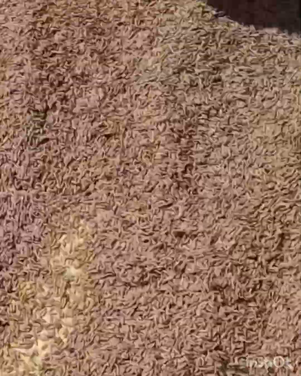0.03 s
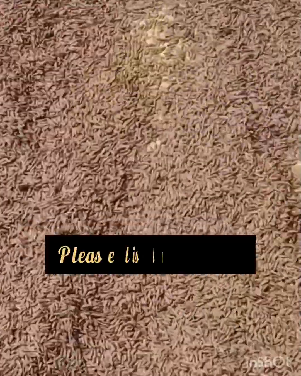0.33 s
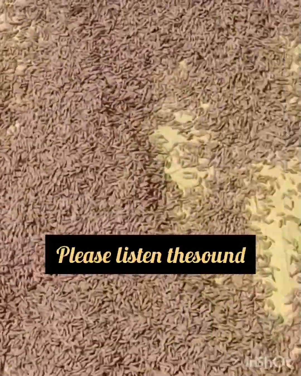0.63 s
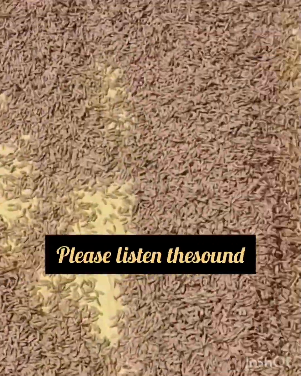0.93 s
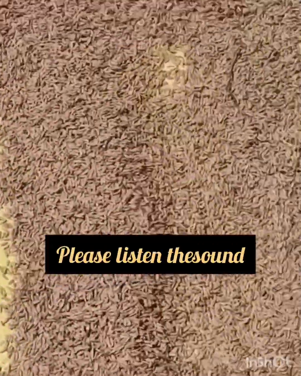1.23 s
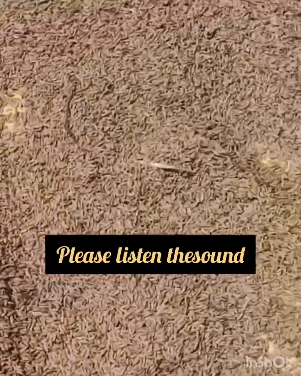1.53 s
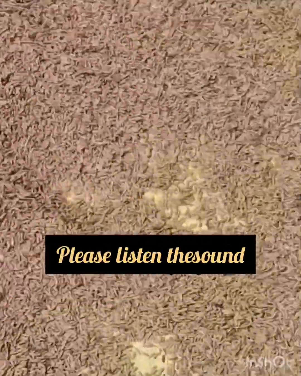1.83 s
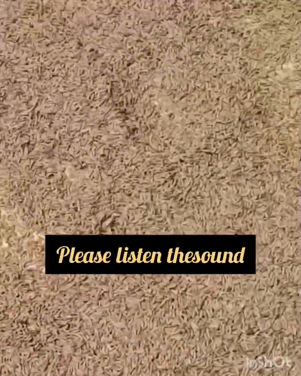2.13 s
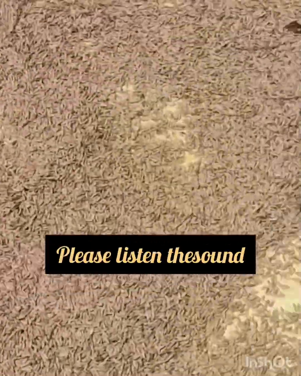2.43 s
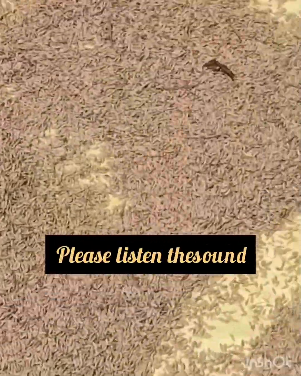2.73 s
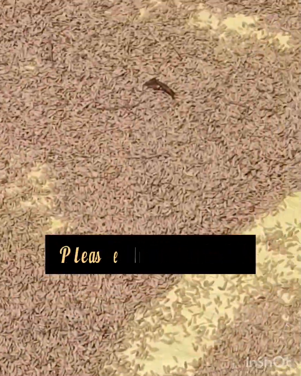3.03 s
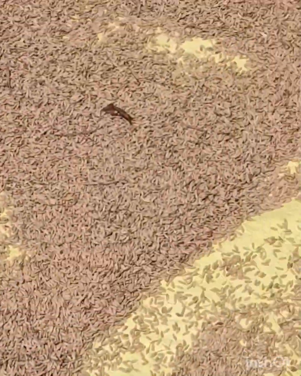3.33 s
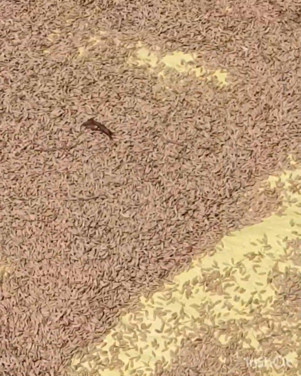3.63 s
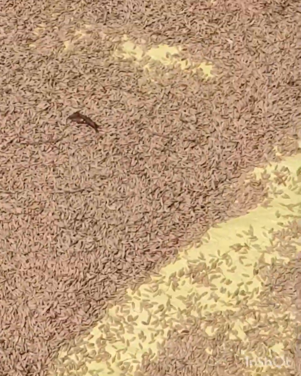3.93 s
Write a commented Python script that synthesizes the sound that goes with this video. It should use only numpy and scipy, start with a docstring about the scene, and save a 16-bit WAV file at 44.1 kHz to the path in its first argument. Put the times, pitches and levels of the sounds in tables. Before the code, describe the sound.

Unhusked rice swept along in five hissing, rustling strokes outdoors.

```python
"""Sweeping rice on a tarpaulin

Unhusked rice is swept along in five strokes, close to a hand-held camera outdoors. Countless husks
rub into a hiss with a fine sizzle on top; where a stroke bears down, a lower scrape and short scuffs
join in. There are three small knocks, and a low wavering hum comes up in the second half."""
import sys
import numpy as np
from scipy import signal
from scipy.fft import rfft, irfft, next_fast_len
from scipy.io import wavfile
from scipy.ndimage import uniform_filter1d, map_coordinates

SR = 44100
rng = np.random.default_rng(int(sys.argv[2]) if len(sys.argv) > 2 else 0)


def materialize(psi):
    """Save the field psi as 16-bit PCM at rate SR to the path in sys.argv[1].

    A 1-D psi becomes a single channel; in a 2-D psi each row is a channel.
    """
    bounded = np.clip(np.atleast_2d(psi).T, -1, 1)
    quanta = np.round(bounded * 32767).astype(np.int16)
    wavfile.write(sys.argv[1], SR, quanta)


N = 176400

# The outdoor background. Each row: frequency in Hz, relative level in dB.
AIR_SPECTRUM = [(15, -37), (25, -6.5), (69, 8.5), (92, 7.5), (306, -14.5), (446, -16.5), (763, -12.5),
                (1030, -35), (1190, -30), (1560, -12.5), (1800, -21.5), (2340, -49), (3960, -120)]
# How the hum swells. Each row: time in seconds, relative level in dB.
HUM_LEVELS = [(2.15, -80), (2.282, -45), (2.458, -43.5), (2.478, -56), (2.53, -43), (2.576, -64),
              (2.648, -50.5), (2.778, -47.5), (2.808, -61), (2.866, -42.5), (2.974, -65), (3.144, -64),
              (3.246, -52.5), (3.514, -66), (3.556, -54), (3.788, -68), (3.906, -46), (4.0, -57)]
# The rumble under the hum. Each row: frequency in Hz, relative level in dB.
RUMBLE_SPECTRUM = [(25, -26), (55, -10), (100, -7.5), (135, -4), (155, -22.5), (200, -17.5), (280, -51.5),
                   (600, -43)]
# The knocks. Each row: start in seconds, thud level in dB, thud pitch in Hz,
# seconds for the thud to fade by 60 dB, tick gain in dB.
KNOCKS = [(1.491, -41.5, 500, 0.026, -37), (1.973, -52.5, 398, 0.014, -56), (2.257, -53.5, 340, 0.039, -36)]
# Where the sweep catches. Each row: middle in seconds, half the length in seconds, pitch in Hz,
# width of the resonance in Hz, relative level in dB, lean to the left in dB.
SCUFFS = [(0.38, 0.15, 347, 80, -63, 3), (0.99, 0.24, 343, 200, -63, -3), (1.22, 0.14, 1770, 250, -45, -5),
          (1.32, 0.091, 504, 119, -58.5, -5), (1.633, 0.12, 1780, 506, -46, -11),
          (1.649, 0.035, 2330, 350, -31.5, 8), (1.697, 0.064, 3300, 352, -32, -4),
          (1.91, 0.16, 1610, 197, -55.5, -6), (2.507, 0.2, 2190, 200, -43.5, 6.5),
          (2.86, 0.15, 726, 398, -67, 5), (3.132, 0.074, 1560, 350, -49, -2),
          (3.14, 0.17, 2670, 402, -50, 14), (3.21, 0.087, 780, 250, -55.5, 2),
          (3.64, 0.074, 730, 298, -52, -1), (3.638, .06, 340, 250, -78, -6)]
# Rubbing husks at the two microphones. Each row: frequency in Hz, left gain in dB, right gain in dB.
HUSK_SPECTRUM = [(260, -12.5, -21.5), (520, -36.5, -27.5), (746, -19, -25), (1105, -18.5, -16),
                 (1420, -17, -14.5), (1736, -26, -17.5), (2130, -8, -13.5), (2620, 5, -10), (3030, 0.5, -8),
                 (3530, 1.5, -6.5), (3780, -1, -9.5), (4500, 3.5, -7.5), (5830, -4, -11.5),
                 (5990, 1.36, -7.5), (6930, -8, -17.5), (7940, -21.5, -33), (9360, -19.5, -19),
                 (10420, -18, -13.5), (11260, -24, -14), (12260, -42, -23.5), (14100, -34, -27.5),
                 (16000, -14, -9), (15100, -24.5, -24.5)]
# How alike the husks sound left and right. Each row: frequency in Hz, likeness from 0 to 1.
LIKENESS = [(300, 0.8), (1300, 0.71), (3000, 0.67), (6000, 0.59), (8000, 1), (11000, 0.68), (15000, .25)]
# One list per stroke. Each row: time in seconds, then relative hiss, sizzle and scrape levels in dB.
STROKE_LEVELS = [
    [(0.0, -56, -53, -67), (0.052, -44, -49.5, -66), (0.11, -24, -39.5, -50.5), (0.14, -27.5, -40, -42),
     (0.22, -25.5, -47, -41.5), (0.276, -26, -48, -44), (0.348, -27, -46, -44), (0.532, -31, -49, -50.5),
     (0.59, -33, -51.5, -48), (0.646, -49.5, -55.5, -70), (0.68, -48.5, -58, -70), (0.72, -57, -60, -73)],
    [(0.72, -53.5, -61, -71), (0.774, -43, -41, -67), (0.806, -37.5, -45, -70), (0.826, -32, -41, -64),
     (1.004, -24.5, -40, -50), (1.024, -29, -41.5, -53), (1.084, -29, -39.5, -49.5),
     (1.138, -29.5, -42, -56), (1.22, -26, -44.5, -49.5), (1.302, -34.5, -52.5, -57.5),
     (1.346, -33, -50, -52.5), (1.372, -46.5, -57, -66), (1.41, -53, -56, -70)],
    [(1.41, -63, -56, -64), (1.43, -47, -54, -79), (1.442, -47.5, -51.5, -68), (1.5, -49.5, -56, -65.5),
     (1.562, -48, -50.5, -67), (1.6, -43, -46.5, -59), (1.66, -34, -46.5, -52), (1.82, -42, -54, -57),
     (1.954, -42.5, -51.5, -63), (2.008, -49, -54.5, -67.5), (2.16, -49, -55, -64.5),
     (2.214, -67, -71, -73), (2.25, -57, -75, -66)],
    [(2.25, -75, -72, -60.5), (2.282, -73, -81, -73), (2.326, -54, -69, -65), (2.342, -49.5, -57, -68),
     (2.548, -38.5, -51.5, -61), (2.562, -41.5, -51.5, -60), (2.782, -41, -52.5, -69),
     (2.856, -40, -52, -62), (2.924, -48, -59.5, -70), (2.976, -51.5, -61, -65), (3.0, -59, -73, -71),
     (3.018, -53, -68, -65), (3.03, -51, -73, -69)],
    [(3.03, -53, -71, -68), (3.05, -67, -77, -68.5), (3.12, -56, -64, -65), (3.186, -51.5, -58, -61),
     (3.292, -49, -66, -73), (3.302, -50.5, -60.5, -72), (3.454, -44.5, -54, -61.5),
     (3.596, -40.5, -51.5, -59.5), (3.642, -42, -53, -51), (3.778, -47.5, -59, -66),
     (3.816, -57, -65, -72.5), (3.954, -59, -59, -70.5), (4.0, -53, -62, -72)],
]
# The tone of each stroke. Each row: hiss's lean to the left in dB, its brightening in dB per octave,
# its resonance in Hz, boost there in dB, left side's delay in ms, scrape's lower edge in Hz.
STROKE_TONES = [(-4, 4.1, 2740, 4, 1.205, 560), (-2.5, 6, 5750, 2.5, 1.14, 363),
                (3.5, 2.5, 2940, 3, 1.26, 890), (0.5, 5, 5900, 2.5, 1.18, 110), (0, 6, 2970, 5, 1.24, 316)]

SCRAPE_TOP_HZ, HISS_TOP_HZ = 2037, 7590  # scrape lies below these, hiss between, sizzle above
LEFT_RIGHT = np.array([[.5], [-.5]])  # splits a difference evenly between the two sides


def amp(db):
    """Turn decibels into a gain."""
    return 10 ** (np.asarray(db) / 20)


def unit(x):
    """Scale a signal to an average (rms) level of 1."""
    return x / np.sqrt(np.mean(x ** 2) + 1e-20)


def along(points, hz):
    """Read between a table's rows on a logarithmic frequency scale."""
    freqs, values = np.transpose(points)
    return np.interp(np.log(hz + 1), np.log(freqs + 1), values)


def wobble(rate):
    """A smooth curve through `rate` random values a second."""
    return map_coordinates(rng.standard_normal(int(N * rate / SR) + 4), [np.arange(N) * rate / SR])


def filtered(x, response):
    """Give each frequency in x the gain that `response` sets for it."""
    n = x.shape[-1]
    padded = next_fast_len(n + 4096)
    return irfft(rfft(x, padded) * response(np.fft.rfftfreq(padded, 1 / SR)), padded)[..., :n]


def below(hz, edge_hz, order=14):
    """A gain that keeps what is below the edge; a higher order cuts more steeply."""
    return 1 / np.sqrt(1 + (hz / edge_hz) ** (2 * order))


def above(hz, edge_hz, order=14):
    """A gain that keeps what is above the edge."""
    return np.sqrt(1 - below(hz, edge_hz, order) ** 2)


def outdoor_air(level_db=-66.5, side_db=-10):
    """Quiet outdoor noise, mostly low and nearly the same on both sides."""
    noise = rng.standard_normal((2, N))
    mid, side = filtered(noise, lambda hz: amp(along(AIR_SPECTRUM, hz)) * below(hz, 2500, order=3))
    return amp(level_db) * unit(mid + amp(side_db) * np.array([side, -side]))


def hum(pitch_hz=105.1, waver=0.0312, tone_db=-2.5, rumble_db=-8.5, side_db=-12):
    """A low wavering tone and a rumble that swell together."""
    times, db = np.transpose(HUM_LEVELS)
    level = amp(np.interp(np.arange(N) / SR, times, db, left=-120) + 0.64 * wobble(25.35))
    pitch = pitch_hz * (1 + waver * wobble(22.01))
    tone = np.sqrt(2) * np.sin(2 * np.pi * np.cumsum(pitch) / SR)
    rumble = unit(filtered(rng.standard_normal(N), lambda hz: amp(along(RUMBLE_SPECTRUM, hz))))
    mid = level * (amp(tone_db) * tone + amp(rumble_db) * rumble)
    side = amp(side_db) * signal.hilbert(mid).imag  # puts left and right slightly out of step
    return np.array([mid + side, mid - side])


def knocks(tick_fade_s=0.006, rustle_db=-13, rustle_fade_s=0.098):
    """Small dull knocks: a tick, a thud of a few cycles and a short rustle near the thud's pitch."""
    out, t = np.zeros(N), np.arange(SR // 10) / SR
    fade = lambda seconds: amp(-60 * t / seconds)
    for start, thud_db, pitch, fade_s, tick_db in KNOCKS:
        tick_noise, noise = rng.standard_normal((2, len(t)))
        tick = filtered(tick_noise * fade(tick_fade_s), lambda hz: below(hz, 4000, order=2))
        rustle = unit(filtered(noise, lambda hz: above(hz, pitch / 2) * below(hz, 1.4 * pitch, order=4)))
        thud = fade(fade_s) * np.sin(2 * np.pi * pitch * t)
        thud += amp(rustle_db) * fade(rustle_fade_s) * rustle
        out[round(start * SR):][:len(t)] += amp(thud_db) * thud + amp(tick_db) * tick
    return out


def husk_contacts(patchy_db, ticks_per_s=5000, spread_db=2.5, tick_share=0.35):
    """Husks touching: three separate streams of tiny ticks over a smooth rush."""
    ticks = (rng.random((3, N)) < ticks_per_s / SR) * rng.choice([-1, 1], (3, N))
    ticks = unit(ticks * amp(spread_db * np.minimum(rng.standard_normal((3, N)), 3)))
    streams = np.sqrt(tick_share) * ticks + np.sqrt(1 - tick_share) * rng.standard_normal((3, N))
    # Random patches of the spectrum grow louder and softer, less so in the high treble.
    spectra = signal.stft(streams, nperseg=1024)[2]
    patches = uniform_filter1d(rng.standard_normal(spectra.shape[1:]), size=4, axis=0)
    patches = unit(uniform_filter1d(patches, size=12, axis=1))
    depth_db = patchy_db * below(np.fft.rfftfreq(1024, 1 / SR), 9100, order=2)[:, None]
    return signal.istft(spectra * amp(depth_db * patches), nperseg=1024)[1][:, :N]


def at_microphones(streams, band, lag_ms, turn_radians=1.36):
    """One band of husk noise in stereo: both sides share one stream and each has one of its own."""
    husks = np.array(HUSK_SPECTRUM)
    shared = filtered(streams[0], lambda hz: np.sqrt(along(LIKENESS, hz)))
    own = filtered(streams[1:], lambda hz: np.sqrt(1 - along(LIKENESS, hz)))
    # The left side hears it later, with an extra turn of phase above the scrape.
    phase = lambda hz: turn_radians * above(hz, SCRAPE_TOP_HZ) - 2 * np.pi * hz * lag_ms / 1000
    colour = lambda hz: amp([along(husks[:, [0, 1]], hz), along(husks[:, [0, 2]], hz)])
    pair = filtered(shared + own, lambda hz: band(hz) * colour(hz) * np.exp(1j * phase(hz) * LEFT_RIGHT))
    return pair / np.sqrt(np.mean(pair.mean(0) ** 2) + 1e-20)  # the two sides' average has level 1


def hiss_band(hz):
    """The range where the husks hiss."""
    return above(hz, SCRAPE_TOP_HZ) * below(hz, HISS_TOP_HZ)


def sizzle_band(hz):
    """The fine treble above the hiss."""
    return above(hz, HISS_TOP_HZ)


def trickle(hiss_db=-52.5, sizzle_db=-60):
    """Settling grain rustles faintly and steadily, even between strokes."""
    streams = husk_contacts(patchy_db=3.2)
    soft_band = lambda hz: hiss_band(hz) * above(hz, 2300) * amp(-1.5 * np.log2(hz + 1))
    hiss = at_microphones(streams, soft_band, lag_ms=1.232)
    sizzle = at_microphones(streams, sizzle_band, lag_ms=1.22)
    return amp(hiss_db) * hiss + amp(sizzle_db) * sizzle


def scuffs(gain_db=-2.6, likeness=0.39, lag_ms=1.19):
    """Where the sweep catches, rough noise swells briefly around one pitch."""
    out, t = np.zeros((2, N)), np.arange(N) / SR
    noise = rng.standard_normal((3, N))
    rough_db = -wobble(120)
    pair = np.sqrt(likeness) * noise[0] + np.sqrt(1 - likeness) * noise[1:]
    delay = lambda hz: np.exp(-2j * np.pi * hz * lag_ms / 1000 * LEFT_RIGHT)
    for middle, half_length, pitch, width, db, lean_db in SCUFFS:
        on = abs(t - middle) < half_length
        ring = unit(filtered(pair[:, on], lambda hz: delay(hz) / (1 + ((hz - pitch) / (width / 2)) ** 2)))
        swell = np.cos(np.pi * (t[on] - middle) / (2 * half_length)) ** 4
        out[:, on] += amp(gain_db + db + rough_db[on] + lean_db * LEFT_RIGHT) * swell * ring
    return out


def sweeping(hiss_gain_db=0.05, sizzle_gain_db=1.42, scrape_gain_db=0.03, ring_half_width_hz=220):
    """Each stroke rubs husks into hiss, sizzle and scrape, fluttering as clumps of grain give way."""
    out, t = np.zeros((2, N)), np.arange(N) / SR
    streams = husk_contacts(patchy_db=2.87)
    flutter_db, scrape_flutter_db = 0.54 * wobble(70), 0.75 * wobble(60)
    for rows, (lean_db, tilt_db, ring_hz, ring_db, lag_ms, edge_hz) in zip(STROKE_LEVELS, STROKE_TONES):
        times, *levels = np.transpose(rows)
        on = (t >= times[0]) & (t < times[-1])
        boost_db = lambda hz: ring_db / (1 + ((hz - ring_hz) / ring_half_width_hz) ** 2)
        bright_hiss = lambda hz: hiss_band(hz) * amp(tilt_db * np.log2((hz + 1) / ring_hz) + boost_db(hz))
        scrape_band = lambda hz: below(hz, SCRAPE_TOP_HZ) * above(hz, edge_hz, order=4)
        layers = [(bright_hiss, hiss_gain_db + lean_db * LEFT_RIGHT),
                  (sizzle_band, sizzle_gain_db),
                  (scrape_band, scrape_gain_db + scrape_flutter_db[on])]
        for (band, gain_db), db in zip(layers, levels):
            loudness = amp(np.interp(t[on], times, db) + flutter_db[on] + gain_db)
            out[:, on] += loudness * at_microphones(streams[:, on], band, lag_ms)
    return out


def scene():
    """Rice in stereo, with the hum, knocks and outdoor air near the middle."""
    return sweeping() + scuffs() + trickle() + hum() + knocks() + outdoor_air()


def record(dry, top_hz=15800):
    """The camera keeps nothing above its highest frequency."""
    return filtered(dry, lambda hz: hz < top_hz)


dry = scene()
out = record(dry)
materialize(out)
```